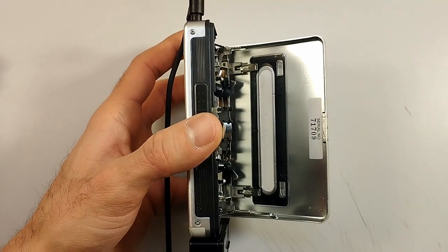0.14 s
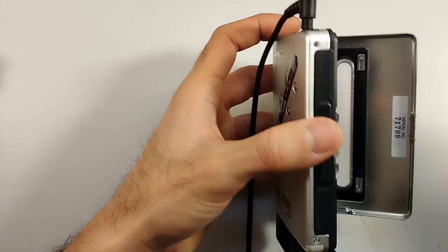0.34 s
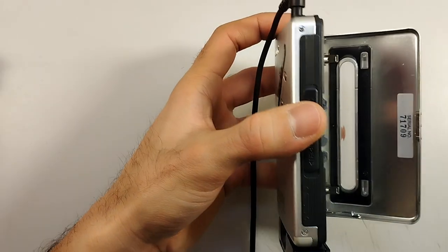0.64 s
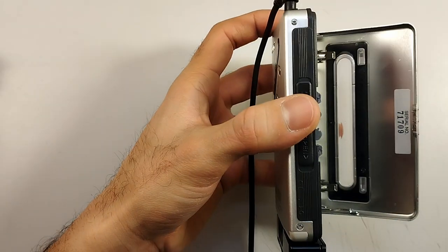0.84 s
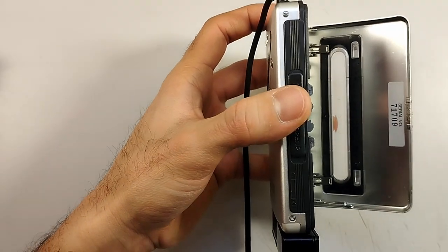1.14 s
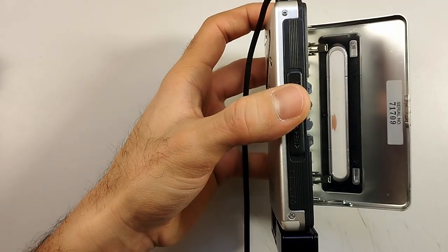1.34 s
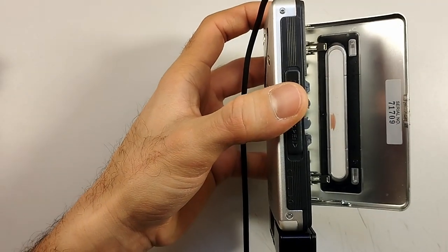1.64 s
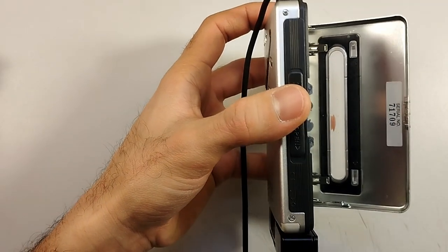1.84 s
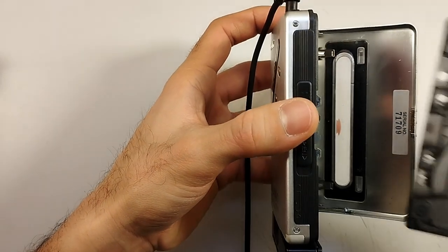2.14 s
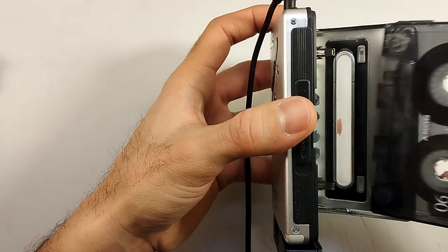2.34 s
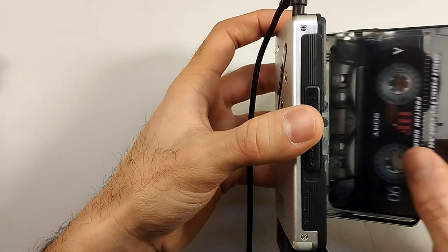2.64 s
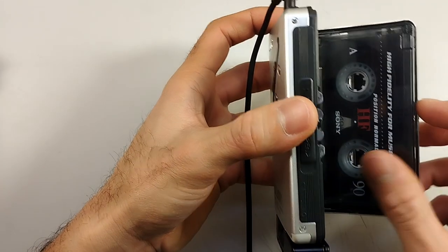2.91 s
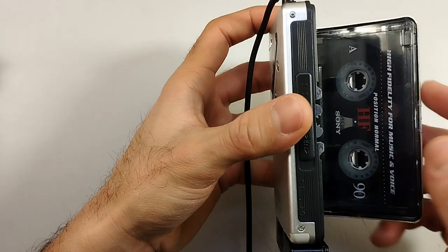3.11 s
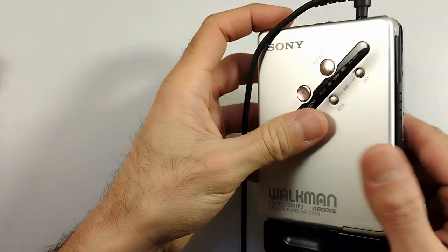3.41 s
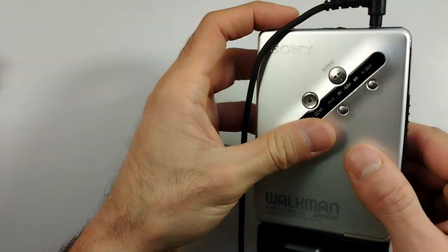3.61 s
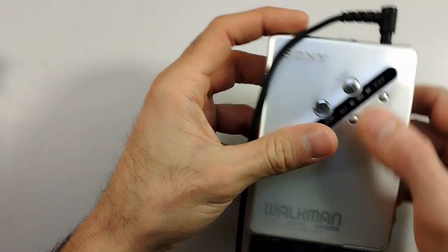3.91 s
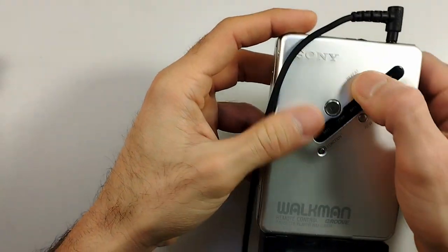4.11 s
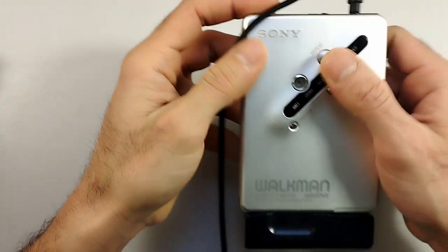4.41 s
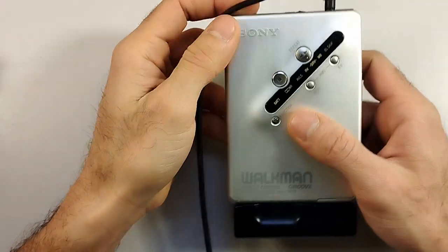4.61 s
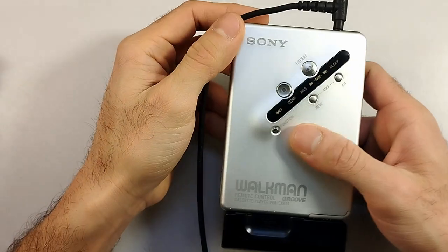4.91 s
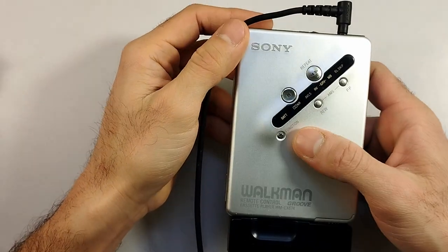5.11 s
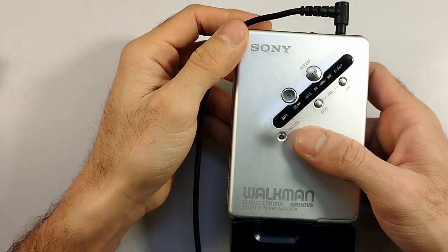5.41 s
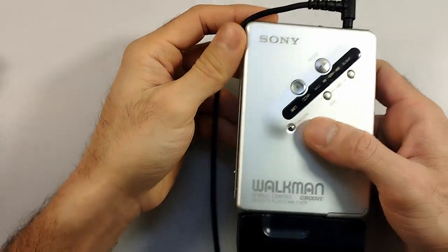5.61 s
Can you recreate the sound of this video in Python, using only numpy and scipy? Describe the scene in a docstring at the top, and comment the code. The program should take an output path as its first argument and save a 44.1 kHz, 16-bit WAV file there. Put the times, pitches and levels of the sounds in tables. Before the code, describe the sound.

A close stereo microphone in a quiet room picks up faint hiss and deep, steady rumble beneath a handheld tape player. From 0 to 0.5 s there are soft plastic scrapes, a low cord rub and a small metallic spring ping. A hollow knock comes at 0.7 s, then the loudest, woody and rattling, at 0.9 s; clacks and a tight run of knocks follow at 1.05-1.25 s. Things calm to faint taps until a sharp high tick at 2.15 s. From 2.45 to 2.95 s a cassette clatters and slides in, ending in a bright, harsh scrape and clack. Smaller clacks at 3.3-3.4 s lead to a hard, bright lid snap at 3.7 s. A crisp button click lands at 4.3 s, others around 4.97 and 5.25 s, with weak clicks and finger taps near 5.45-5.7 s. Skin rustles lightly throughout; reflections die quickly.

```python
"""Knocks, clacks and clicks: a pocket tape player is handled above a desk in a quiet room.
A cassette slides in, the lid snaps shut, buttons click; fingers rustle on the case and the cord drags.
Every blow is a short chatter of contacts cracking in five bands and ringing plastic and sheet-metal modes.
Friction is uneven noise, the room air and deep rumble are steady noise, and reflections are dying noise.
Two microphone ports colour each side; then a gain control ducks the loud blows and creeps back."""
import sys
import numpy as np
from scipy import signal
from scipy.fft import rfft, irfft, next_fast_len
from scipy.io import wavfile
from scipy.ndimage import uniform_filter1d

SR = 44100
rng = np.random.default_rng(int(sys.argv[2]) if len(sys.argv) > 2 else 0)


def to_wav(s):
    """Save 16-bit WAV."""
    ch = np.atleast_2d(s).T  # columns
    pcm = np.round(np.clip(ch, -1, 1) * 32767)  # PCM
    wavfile.write(sys.argv[1], SR, pcm.astype(np.int16))


N = 253663


def amp(db):
    """Decibels to gain."""
    return 10 ** (np.asarray(db) / 20)


def rms_one(x):
    """Scales to unit rms."""
    return x / np.sqrt(np.mean(x ** 2) + 1e-20)


def at_hz(points, hz):
    """Reads a spectrum table on a log-frequency axis."""
    p = np.array(points)
    return np.interp(np.log(np.maximum(hz, 1)), np.log(p[:, 0]), p[:, 1])


def band(x, low_hz, high_hz, order=2):
    """Butterworth band-pass."""
    sos = signal.butter(order, [low_hz, min(high_hz, SR / 2.2)], "band", fs=SR, output="sos")
    return signal.sosfilt(sos, x)


def decaying(t, t60_s):
    """Envelope that falls 60 dB in t60_s."""
    return np.exp(-np.log(1000) * t / t60_s)


def ring(t, hz, db, t60_s):
    """One mode's answer to a click: a dying sine, its energy set by db."""
    wave = np.sin(2 * np.pi * hz * t) * decaying(t, t60_s)
    return amp(db) * wave / np.linalg.norm(wave)


def lumpy(depth_db, width, length):
    """Slow random gain: smoothed noise (width in samples) with an rms swing of depth_db."""
    return amp(depth_db * rms_one(uniform_filter1d(rng.standard_normal(length), width)))


def stereo_pair(mid, side, likeness):
    """Left and right that share as much as the likeness says: 0 unrelated, 1 the same."""
    return np.sqrt(1 + likeness) * mid + np.sqrt(1 - likeness) * side * [[1], [-1]]


def add(out, start_s, sound, pan_db):
    """Mixes a sound in at start_s; positive pan_db leans left."""
    i = round(start_s * SR)
    out[:, i:i + sound.shape[-1]] += sound[..., :N - i] * amp([[pan_db / 2], [-pan_db / 2]])


# room air and microphone hiss: pitch_hz [Hz], density_db [dB per Hz, relative]
AIR_SPECTRUM = [(32, -27), (55, -9), (87, -7.5), (118, -12), (204, -18), (266, -10.5), (337, -20),
                (584, -27), (5910, -44.5), (8260, -54), (11000, -55.5), (12700, -48.5), (14600, -46),
                (16500, -62.5)]
# how alike the air sounds left and right: pitch_hz [Hz], likeness [0 to 1]
AIR_LIKENESS = [(25, 0), (130, 0.084), (600, 0.21), (1500, 0.0), (15000, 0.43)]
AIR_DB = -59.5


def hum():
    """Room air and hiss: steady noise shaped by a spectrum, partly alike in the two channels."""
    size = next_fast_len(N)
    hz = np.arange(size // 2 + 1) * SR / size
    mid, side = rfft(rng.standard_normal((2, size))) * amp(at_hz(AIR_SPECTRUM, hz))
    pair = stereo_pair(mid, side, at_hz(AIR_LIKENESS, hz))
    return amp(AIR_DB) * rms_one(irfft(pair, size)[:, :N])


RUMBLE_HZ, RUMBLE_WIDTH_HZ, RUMBLE_DB = 36, 13, -50


def rumble():
    """A machine somewhere in the building: a narrow band of deep noise, nearly alike left and right."""
    low_hz, high_hz = RUMBLE_HZ - RUMBLE_WIDTH_HZ / 2, RUMBLE_HZ + RUMBLE_WIDTH_HZ / 2
    noise = rng.standard_normal((2, N + SR))
    mid, side = band(noise, low_hz, high_hz, order=3)[:, SR:]   # skip the filter's start-up
    return amp(RUMBLE_DB) * rms_one(mid + 0.34 * side * [[1], [-1]])


# skin on the case: time_s [s], dull_db [dB], bright_db [dB]
SKIN_LEVELS = [(0, -78.5, -70.5), (.3, -65, -68.5), (.55, -77, -72.5), (1.15, -57, -63),
               (1.399, -84.5, -79.5), (1.599, -77, -70.5), (2.05, -79, -72), (2.4, -90, -86),
               (2.699, -56.5, -62.5), (3.05, -83.5, -79.5), (3.35, -73, -60.5), (3.5, -90, -81),
               (3.83, -78, -79), (3.94, -70.5, -56.5), (4.12, -86, -82), (4.419, -76, -74.5),
               (4.57, -66.5, -63.5), (4.679, -73, -75), (5.1, -73, -72), (5.75, -78, -79)]


def rustle():
    """Dense uneven grains of friction, clumped by stick and slip, in a dull and a bright band."""
    time_s, dull_db, bright_db = np.transpose(SKIN_LEVELS)
    t = np.arange(N) / SR
    unevenness = amp(2.0 * rng.standard_normal(N)) * lumpy(0.68, 500, N)
    dull_grains, bright_grains = rng.standard_normal((2, 2, N)) * unevenness
    dull = amp(np.interp(t, time_s, dull_db)) * rms_one(band(dull_grains, 700, 2000))
    bright = amp(np.interp(t, time_s, bright_db)) * rms_one(band(bright_grains, 4600, 15500))
    return dull + bright


# modes of the hollow shell: pitch_hz [Hz], level_db [dB], t60_s [s]
SHELL_MODES = [(513.6, 5, 0.034), (688.7, -0.5, 0.023), (747, -1, .04), (890, 1.5, 0.011),
               (1115, -3.5, 0.084), (1300, -3.5, .025), (1485, 3, 0.031)]
# modes of the sheet-metal lid: pitch_hz [Hz], level_db [dB], t60_s [s]
LID_MODES = [(1757, -1, 0.054), (2050, 1, 0.035), (2200, 2.8, .015), (2560, -2.5, 0.013), (3310, -14, 0.02),
             (3930, -8.5, .012)]
# plastic slides on plastic: start_s [s], hardest_s [s], body_db [dB], edge_db [dB], favoured_hz [Hz]
SCRAPE_EVENTS = [(0.044, 0.093, -48, -53, 1534), (0.195, 0.291, -53, -51.5, 2090),
                 (0.352, 0.416, -83, -55, 2000), (1.095, 1.113, -38, -51, 1840),
                 (2.5, 2.556, -47.5, -51.5, 1640), (2.566, 2.585, -45.5, -57, 1300),
                 (2.711, 2.767, -49, -47.5, 2300), (2.821, 2.914, -47.5, -49.5, 2700),
                 (2.888, 2.913, -30, -25, 2520), (3.271, 3.337, -47, -47.5, 1410),
                 (3.337, 3.38, -43, -42, 1300)]
SLIPS_PER_S, CLUMP_DB = 4000, 3.0
# pressure builds to the hardest moment, then lets go
SCRAPE_SWELL_DB, SCRAPE_FALL_DB, SCRAPE_FALL_S = 16, 17.5, 0.038


def scrapes():
    """Uneven slips, in clumps, ring the shell and lid modes and hiss off the edges."""
    out, t = np.zeros((2, N)), np.arange(8192) / SR
    for start_s, hardest_s, body_db, edge_db, favoured_hz in SCRAPE_EVENTS:
        happens = rng.random((2, len(t))) < SLIPS_PER_S / SR
        slips = happens * rng.standard_normal((2, len(t))) * lumpy(CLUMP_DB, 300, len(t))
        swell_s = hardest_s - start_s
        end_s = swell_s + SCRAPE_FALL_S
        fade = np.clip(np.minimum(t / .008, (end_s - t) / 0.021), 0, 1)
        pressure_db = np.interp(t, [0, swell_s, end_s], [-SCRAPE_SWELL_DB, 0, -SCRAPE_FALL_DB])
        slips = slips / np.std(slips) * fade * amp(pressure_db)
        modes = 0
        for hz, db, t60_s in SHELL_MODES[2:] + LID_MODES[:5]:
            favour_db = 8 * np.exp(-(np.log2(hz / favoured_hz) / 0.43) ** 2)
            modes = modes + ring(t[:4096], hz, db + favour_db, t60_s)
        ringing = signal.fftconvolve(slips, modes[None] / np.linalg.norm(modes), axes=1)[:, :len(t)]
        body = band(ringing + 0.21 * slips, 567, 2130)
        edge = band(slips, 2100, 8100)
        add(out, start_s, amp(body_db) * body + amp(edge_db) * edge, 0)
    return out


CORD_S, CORD_SPREAD_S, CORD_DB = .27, .11, -53.5   # middle, spread, level before the swell and fade


def cord():
    """The cord drags over the desk: a low lumpy rub, swelling and fading once."""
    t = np.arange(N) / SR
    rub = rms_one(band(rng.standard_normal(N) * lumpy(3.8, 900, N), 55, 267))
    return amp(CORD_DB) * rub * np.exp(-((t - CORD_S) / CORD_SPREAD_S) ** 2)


# fingertips tap the case: start_s [s], level_db [dB], favoured_hz [Hz], hardness_db [dB]
TAP_EVENTS = [(0.137, -50, 1480, -3), (0.283, -55.5, 2150, 13.5), (0.568, -53.5, 1140, 1),
              (1.586, -56, 940, 8.5), (1.878, -54.5, 921, -11.5), (3.177, -58.5, 1443, -1),
              (4.037, -59, 732, 3), (4.365, -52.5, 742, -5.5), (4.567, -53, 860, -4.5),
              (4.729, -62, 1100, 4), (4.768, -60.5, 1100, 6), (5.432, -58.5, 1570, -6),
              (5.472, -62, 1690, -1.5), (5.564, -65.5, 2010, 6)]
# catches and buttons click: start_s [s], level_db [dB], favoured_hz [Hz], case_weight_db [dB], sparkle_db [dB]
CLICK_EVENTS = [(0.194, -58, 2200, 4, 0), (2.146, -36.5, 3740, -58, 6), (2.868, -58, 2750, -3, -6),
                (2.904, -43.5, 2630, -18, -15), (3.371, -36.5, 3200, -8, -5.5), (3.602, -53.5, 2050, 7, -4),
                (3.645, -57.5, 1300, 9, 1), (3.702, -23.5, 2050, -5, 0.5), (4.209, -55.5, 740, 10, -8),
                (4.294, -31.5, 4170, -23, -3.5), (4.9, -51, 1840, -1, 1.5), (4.969, -43.5, 453, -8, -6),
                (4.973, -34.5, 2000, -18, 0), (5.148, -64.5, 1600, 11, -5), (5.166, -52, 1780, 5.5, 1.5),
                (5.237, -39.5, 1540, 0, -3), (5.273, -38.5, 2700, -7, -2), (5.616, -51, 1785, -2, 2),
                (5.679, -66.5, 1600, 10, -12.5)]
# the player knocks the desk: start_s [s], level_db [dB], favoured_hz [Hz], desk_thump_db [dB],
# hardness_db [dB], rattle_db [dB]
KNOCK_EVENTS = [(0.703, -28.5, 494, 7.5, 0.5, -31.5), (0.886, -13.5, 720, -7, -1.5, -22.5),
                (1.191, -27, 920, 1.5, 0, -29), (1.219, -19.5, 806, -2, -3, -27),
                (1.239, -19, 680, -7, 0, -30)]
# loose parts land after each knock: delay_s [s], level_db [dB, on top of rattle_db]
RATTLE_LANDINGS = [(.010, -2), (.019, -0.5), (.045, -7.5)]
# plastic clacks on plastic: start_s [s], level_db [dB], favoured_hz [Hz], lid_ring_db [dB], hardness_db [dB]
CLACK_EVENTS = [(1.041, -44, 1370, 4, -3), (1.1, -39.5, 2211, 12.5, 7.5), (1.17, -40, 2270, 8.5, 1),
                (2.102, -46, 1130, -5, -5), (2.113, -45, 960, -17, -14), (2.456, -34, 1470, -4.5, 3),
                (2.512, -48, 1044, -5.5, -3), (2.565, -34, 673, -3, 6), (2.646, -43, 930, -10, -10),
                (2.69, -52.5, 1490, -4, -4), (2.738, -47, 1300, -10, -11), (2.76, -42.5, 1750, -3, -1),
                (2.889, -34.5, 2740, 14.5, 6.5), (2.918, -31.5, 1470, 7, 12.5), (3.271, -46, 1450, 8.5, 9),
                (3.334, -37, 1420, 12, -23), (3.358, -40.5, 2850, 9, -17), (3.384, -39.5, 1330, 8.5, -6),
                (3.393, -38, 1360, -14, -20), (3.657, -44.5, 1740, 7.5, 2), (3.699, -28.5, 2150, 8, -6)]
# knock, clack, click, tap: shares_db of desk, shell, lid, edges, top [dB];
# moved, how far each colour column moves each share [dB per dB]; chatter_ms [ms]; pan_db [left-right dB]
BLOW_KINDS = [([0, -1, -7, -3.5, -5.5], [[1, 0.0036, 0, 0.14, 0], [-1, 0.0033, 0.9, 0.45, 0.35]],
              2.3, -0.4), ([-43.5, 0, -18, -11.5, -16], [[0, 0, 1.3, 0.037, 0],
              [0, 0.0018, 0.26, 0.65, 1.1]], 1.9, 1.6), ([-10.5, -8, -6.5, 1, 3], [[.9, 1, 0.32, 0.013, 0],
              [0, 0.16, 0.068, 0, 1.5]], 1.7, 2.1), ([0.5, -1, -15.5, -12.5, -17], [[0.5, 0, .9, 1, 1.6]],
              2.7, 0.8)]


def every_blow():
    """All blows as (start_s, five part levels in dB, favoured_hz, chatter_ms, pan_db)."""
    knocks = [knock[:-1] for knock in KNOCK_EVENTS]
    for start_s, _, *rest, rattle_db in KNOCK_EVENTS:
        for delay_s, db in RATTLE_LANDINGS:
            knocks.append((start_s + delay_s, rattle_db + db, *rest))
    found = []
    events = (knocks, CLACK_EVENTS, CLICK_EVENTS, TAP_EVENTS)
    for rows, (shares_db, moved, chatter_ms, pan_db) in zip(events, BLOW_KINDS):
        for start_s, level_db, favoured_hz, *colour_db in rows:
            parts_db = level_db + np.array(shares_db) + np.array(colour_db) @ moved
            found.append((start_s, parts_db, favoured_hz, chatter_ms, pan_db))
    return found


# modes of the desk top: pitch_hz [Hz], level_db [dB], t60_s [s]
DESK_MODES = [(86.4, 1, .2), (135, -2.5, 0.15), (171, -1, 0.063), (275.8, -2.5, 0.17), (393.4, -4.5, 0.082)]
# modes of the stiff edges: pitch_hz [Hz], level_db [dB], t60_s [s]
EDGE_MODES = [(4400, 0, .008), (5300, 0, .008), (6050, 0, .008), (6900, 0, .008)]
# desk, shell, lid, edges, top: low_hz [Hz], high_hz [Hz], crack_db [toneless crack against the modes, dB],
# likeness [left-right, 0 to 1], stretch [times the chatter time]
BODY_PARTS = [(55.6, 940, -6, 0.96, 0.86), (412, 1770, 3, 0.55, 1.1), (1389, 3240, 1.5, 0.13, 1),
              (3707, 8000, 14, 0.8, 1.1), (8500, 26000, 0, 0.19, 1.4)]
# the contacts stand out at the height of the chatter: strength, width as a share of the chatter time
SNAP, SNAP_WIDTH = 0.37, .12


def struck_bodies():
    """Each part's answers to one contact: a band-limited crack, then its modes."""
    t = np.arange(int(.3 * SR)) / SR
    bodies = []
    all_modes = (DESK_MODES, SHELL_MODES, LID_MODES, EDGE_MODES, [])   # the top only cracks
    for modes, (low_hz, high_hz, crack_db, likeness, stretch) in zip(all_modes, BODY_PARTS):
        crack = band(1.0 * (t == 0), low_hz, high_hz, order=4)
        answers = [amp(crack_db) * crack / np.linalg.norm(crack)]
        answers += [ring(t, *mode) / np.sqrt(len(modes)) for mode in modes]
        modes_hz = np.array([1] + [mode[0] for mode in modes])   # 1 Hz keeps the crack unfavoured
        bodies.append((np.array(answers), modes_hz, likeness, stretch))
    return bodies


def blows():
    """A swelling and dying run of uneven contacts cracks in five bands and rings the modes.
    Returns the direct sound, and one clean pulse per blow: its sum over all directions, for the room."""
    direct, radiated = np.zeros((2, 2, N))
    bodies = struck_bodies()
    short = np.arange(4096) / SR
    for start_s, parts_db, favoured_hz, chatter_ms, pan_db in every_blow():
        grit = rng.standard_normal((2, len(short))) * amp(3.0 * rng.standard_normal(len(short)))
        for (answers, modes_hz, likeness, stretch), part_db in zip(bodies, parts_db):
            age = short / (stretch * chatter_ms / 1000)
            snap = SNAP * np.exp(-((age - 1) / SNAP_WIDTH) ** 2)
            shared, own = grit * ((age + 0.033) * np.exp(-age) + snap)
            # the struck spot moves its nearest modes most
            favour_db = 13 * np.exp(-(np.log2(modes_hz / favoured_hz) / 0.32) ** 2)
            body = amp(favour_db + rng.normal(0, 2, len(answers))) @ answers
            contacts = stereo_pair(shared, own, likeness)
            part = signal.fftconvolve(body[None], contacts, axes=1)[:, :answers.shape[1]]
            level = amp(part_db) * np.sqrt(512)   # energy of that level held for 12 ms
            add(direct, start_s, level * part / np.sqrt(np.sum(part ** 2) / 2), pan_db)
            add(radiated, start_s + chatter_ms / 1000, level * body / np.linalg.norm(body), 0)
    return direct, radiated


# a spring twangs: start_s [s], pitch_hz [Hz], level_db [dB], t60_s [s]
SPRING_TONES = [(0.72, 820, -57.5, 0.82), (0.285, 1100, -55, 0.26), (0.272, 2070, -47, 0.12),
                (0.275, 3850, -60, 0.25), (0.275, 5100, -61, 0.12), (2.15, 880, -63, .45),
                (2.15, 1780, -68, .45)]


def spring():
    """Thin tones, wavering in level, left ringing after a few of the blows."""
    out, t = np.zeros((2, N)), np.arange(SR // 2) / SR
    for start_s, hz, db, t60_s in SPRING_TONES:
        waver = 1 + 0.31 * rms_one(uniform_filter1d(rng.standard_normal(len(t)), 600))
        envelope = waver * decaying(t, t60_s) * np.minimum(t / 0.0021, 1)
        add(out, start_s, amp(db) * np.sin(2 * np.pi * hz * t) * envelope, 0)
    return out


# reflections by band: centre_hz [Hz], level_db [dB], t60_s [s], likeness [left-right, 0 to 1]
ROOM_BANDS = [(125, -3, 0.38, 1), (378, -1.5, 0.19, .7), (1006, -9, 0.2, 0.1), (2880, -9, 0.23, 0.28),
              (6500, -9, 0.21, 0.1), (13000, -9, 0.17, 0.1)]


def room(x):
    """Diffuse reflections: noise dying band by band, after a build-up of 1.6 ms."""
    t = np.arange(SR // 2) / SR
    echo = 0
    for hz, db, t60_s, likeness in ROOM_BANDS:
        fall = decaying(t, t60_s)
        mid, side = band(rng.standard_normal((2, len(t))), hz / 1.65, hz * 1.65) * fall
        pair = stereo_pair(mid, side, likeness)
        echo = echo + amp(db) * pair / np.sqrt(2 * np.sum(fall ** 2))
    echo = echo * np.minimum(t / 0.0016, 1)
    return signal.fftconvolve(x.mean(axis=0)[None], echo, axes=1)[:, :N]


# tilt between the two ports: pitch_hz [Hz], left_right_db [dB]
PORT_TILT = [(60, 2.5), (110, -1), (200, 1), (380, 0), (700, -2), (1290, -0.5), (2380, 0.5), (4400, -3.5),
             (8120, -4), (15000, 7.5)]
# colour shared by both ports: pitch_hz [Hz], level_db [dB]
PORT_COLOUR = [(300, -7), (3000, 7), (6500, 0), (7400, -7.5), (8250, -12.5), (9500, -4.5), (10900, -11),
               (13000, 0.5), (15300, -3), (16200, -7.5)]
LEFT_LEAD_US = 50.1


def ports(x):
    """Two microphone ports: a shared colour, a tilt between them and a small lead of the left."""
    size = next_fast_len(N + 4096)
    hz = np.arange(size // 2 + 1) * SR / size
    lead = np.exp(1j * np.pi * hz * LEFT_LEAD_US * 1e-6)   # half the lead; the right lags by the rest
    half = amp(at_hz(PORT_TILT, hz) / 2) * lead
    return irfft(rfft(x, size) * amp(at_hz(PORT_COLOUR, hz)) * [half, 1 / half], size)[:, :N]


def scene():
    """Player and hands heard through room and ports, over the cord, hum and rumble."""
    direct, radiated = blows()
    near = spring() + rustle() + scrapes()
    handled = ports(direct + near + room(radiated + near))
    return handled + cord() + hum() + rumble()


LIMIT, CUTOFF_HZ = 1.05, 17000   # ceiling of the rounded peaks; treble 90 dB down from here


def record(dry):
    """Gain control: loud blows pull the gain down, it creeps back; peaks are rounded, the treble is cut."""
    threshold_db, slope, release_db_s, smoothing_s = -30, 0.13, 12, 0.011
    t = np.arange(N) / SR
    level_db = 10 * np.log10(uniform_filter1d(np.mean(dry ** 2, axis=0), 441) + 1e-12)   # over 10 ms
    cut_db = slope * np.maximum(level_db - threshold_db, 0)
    held_db = np.maximum.accumulate(cut_db + release_db_s * t) - release_db_s * t
    r = np.exp(-1 / (smoothing_s * SR))
    gain = amp(-signal.lfilter([1 - r], [1, -r], held_db))
    rounded = LIMIT * np.tanh(dry * gain / LIMIT)
    return signal.sosfilt(signal.cheby2(16, 90, CUTOFF_HZ, fs=SR, output="sos"), rounded)


dry = scene()
out = record(dry)
to_wav(out)
```